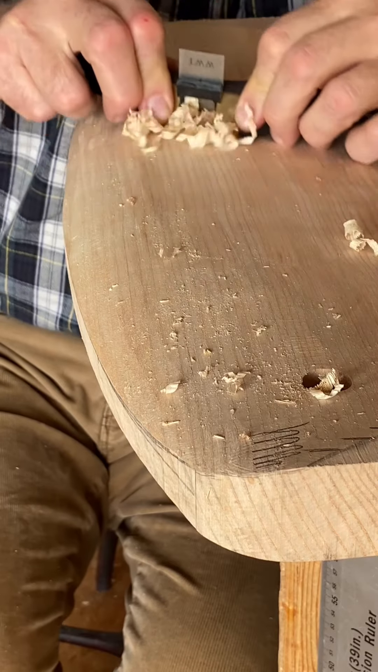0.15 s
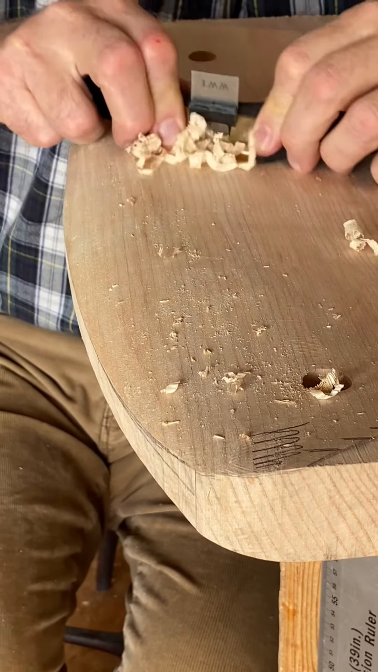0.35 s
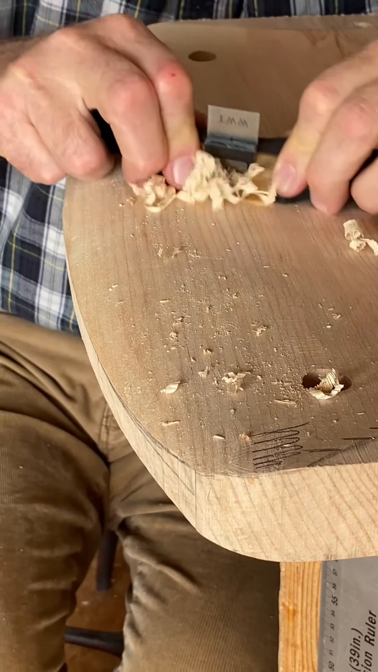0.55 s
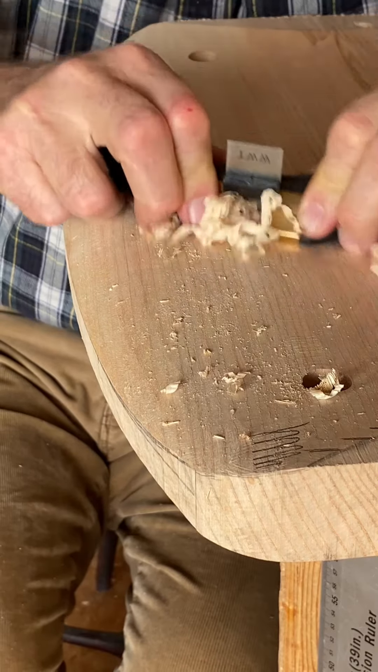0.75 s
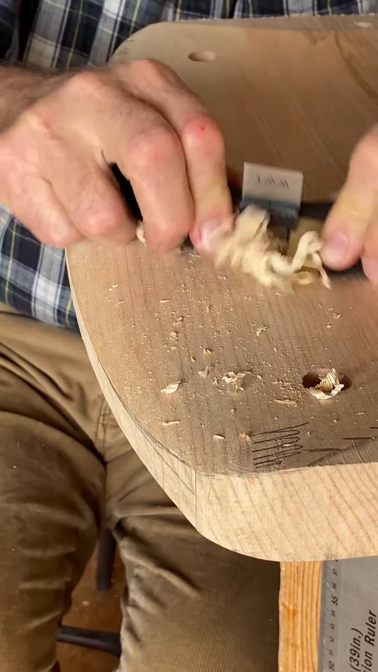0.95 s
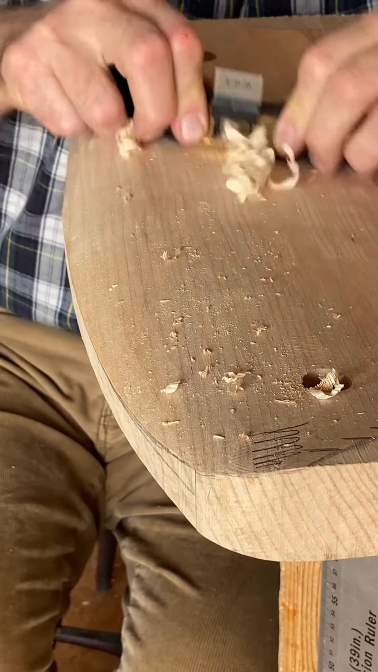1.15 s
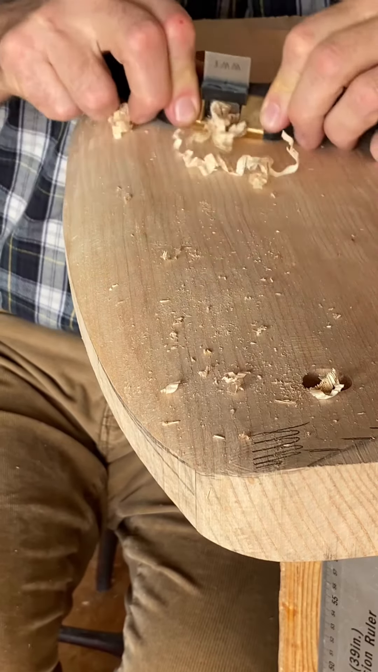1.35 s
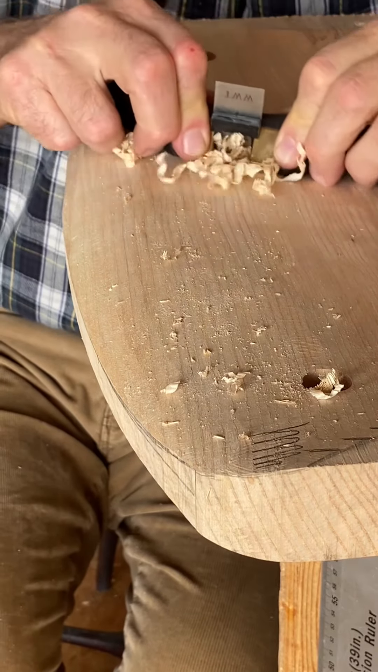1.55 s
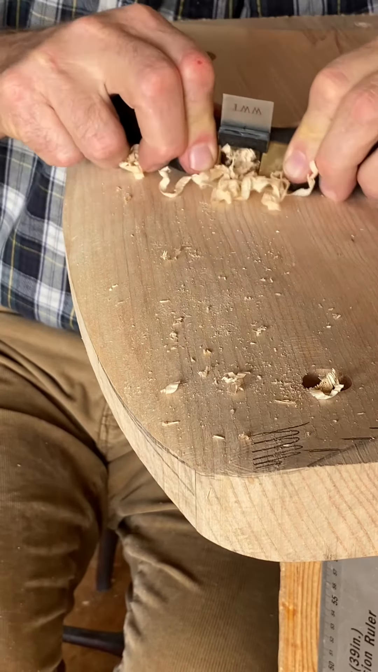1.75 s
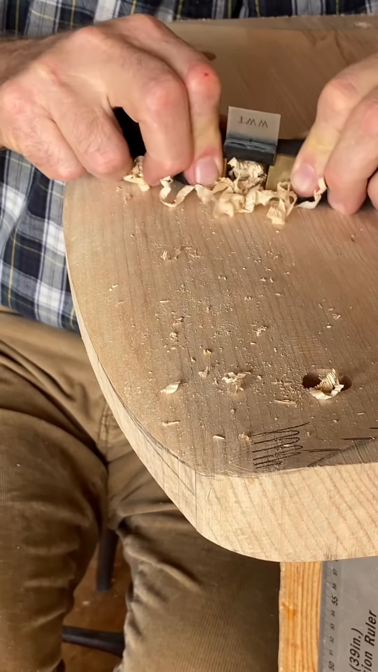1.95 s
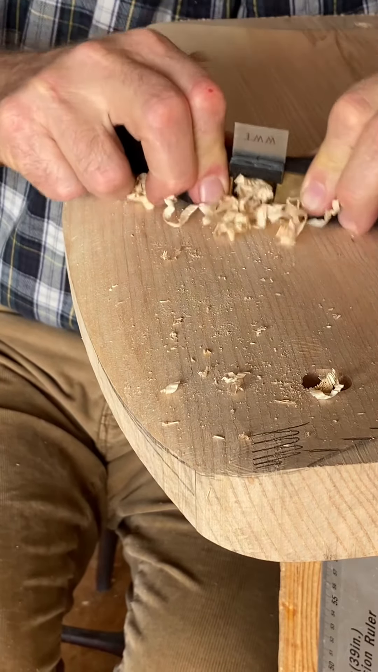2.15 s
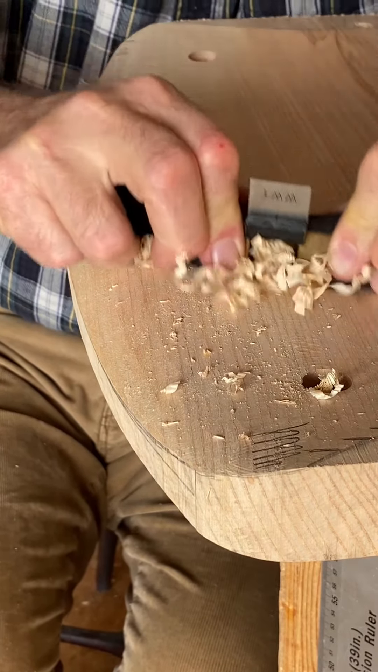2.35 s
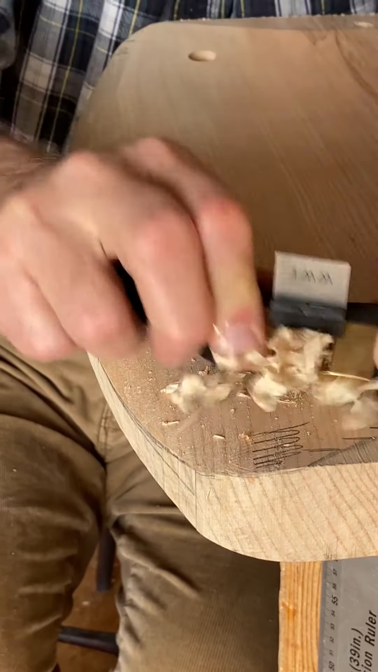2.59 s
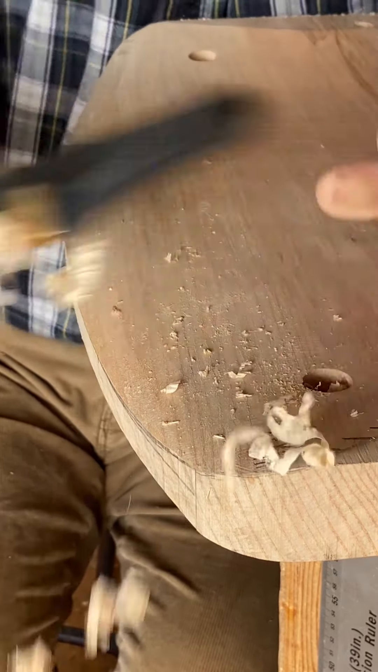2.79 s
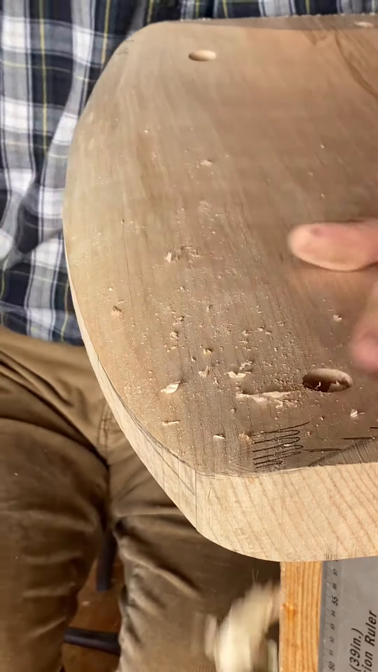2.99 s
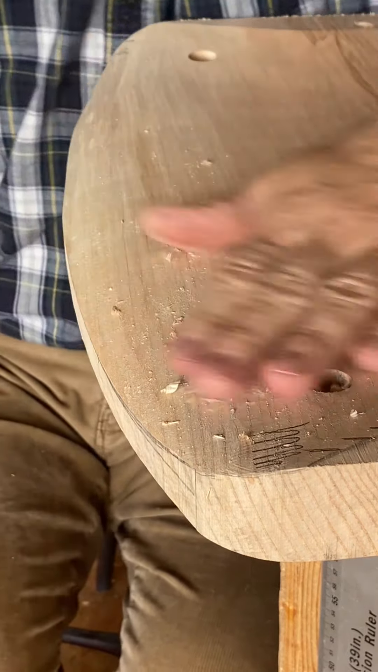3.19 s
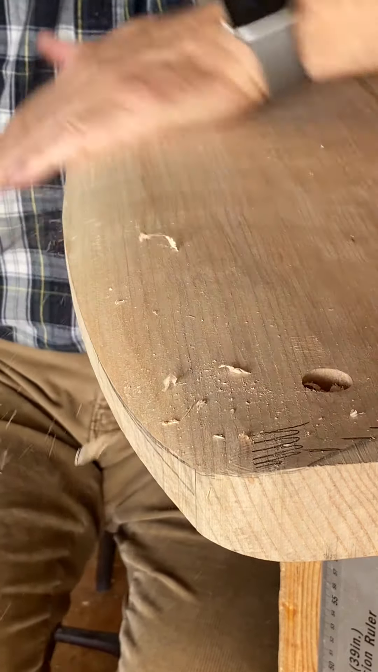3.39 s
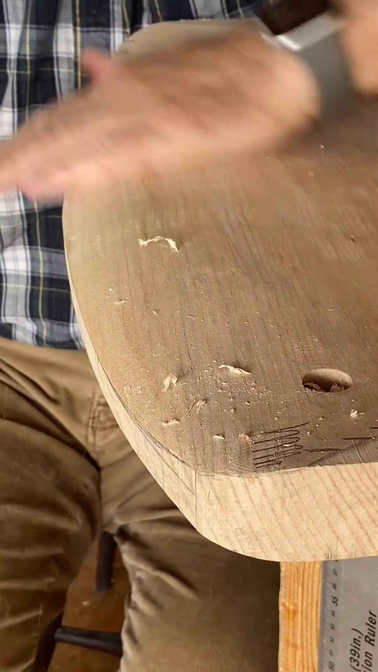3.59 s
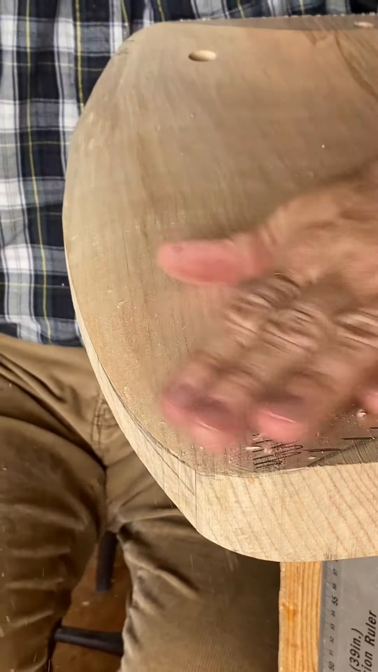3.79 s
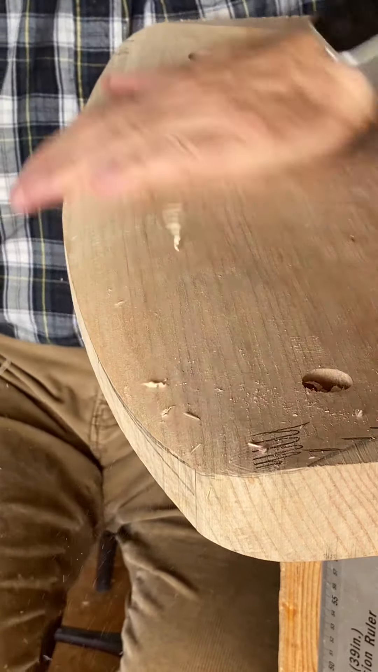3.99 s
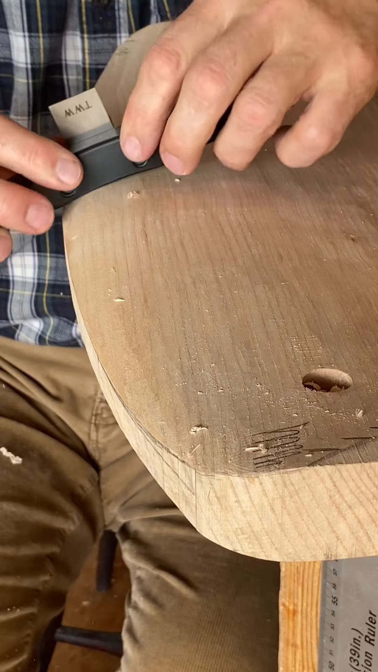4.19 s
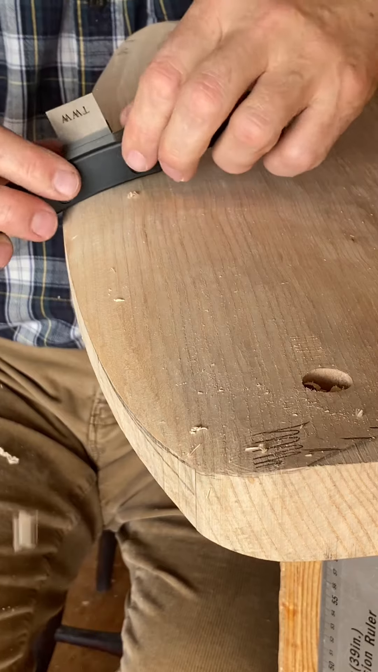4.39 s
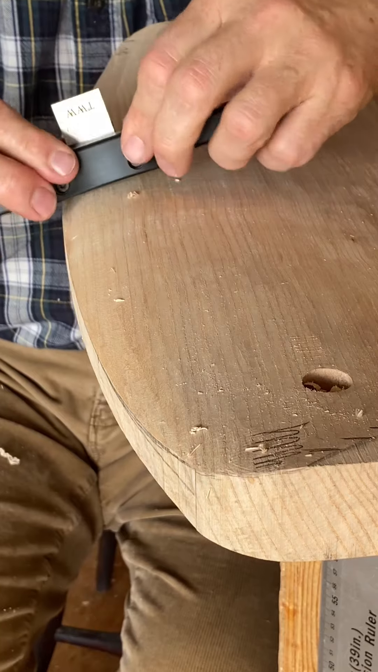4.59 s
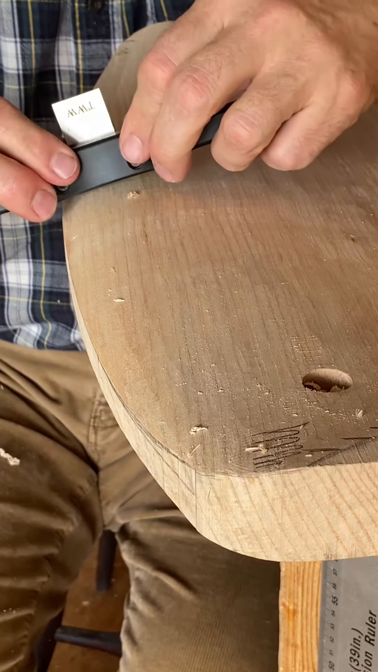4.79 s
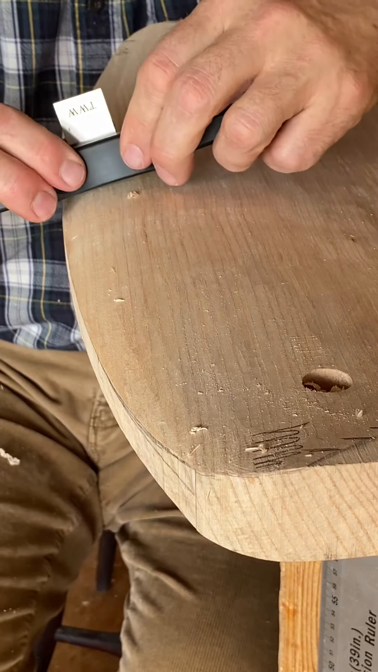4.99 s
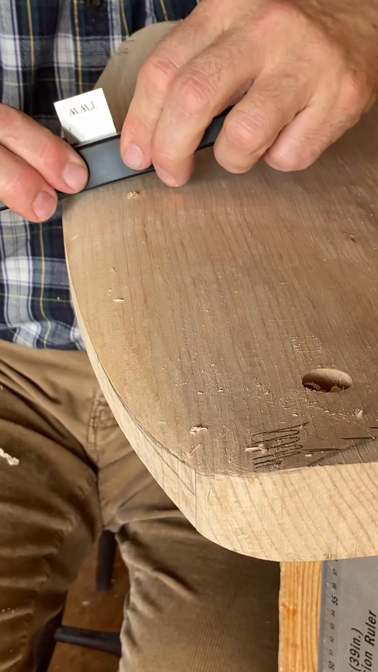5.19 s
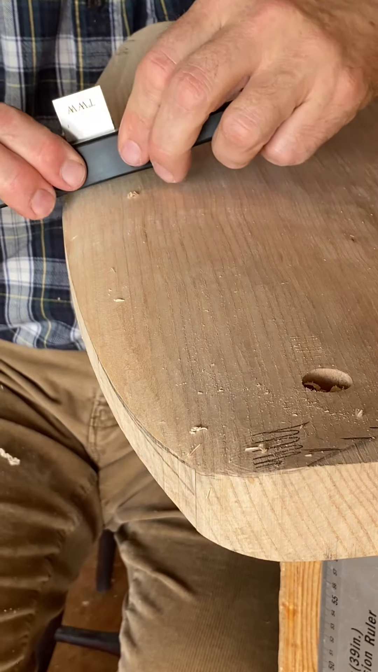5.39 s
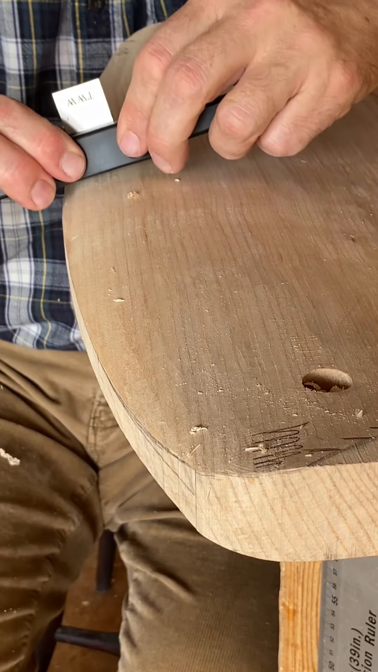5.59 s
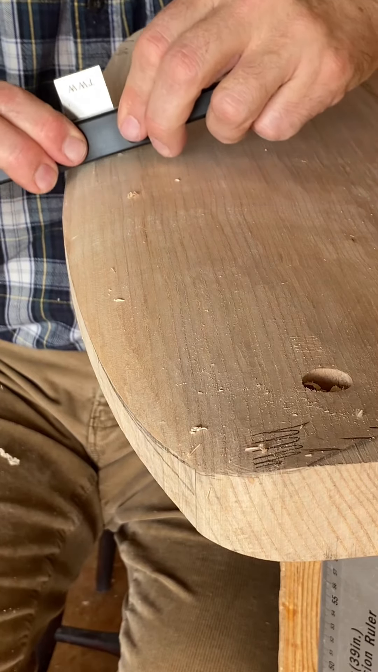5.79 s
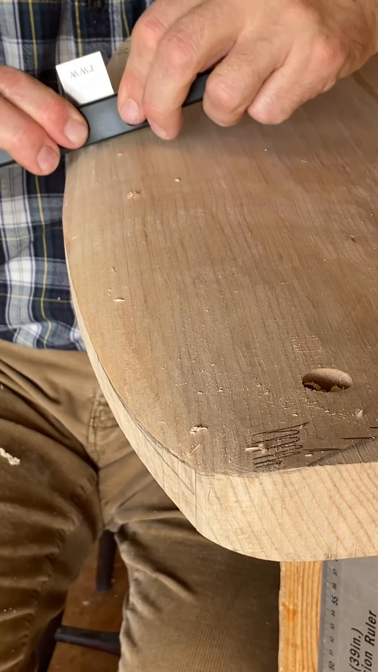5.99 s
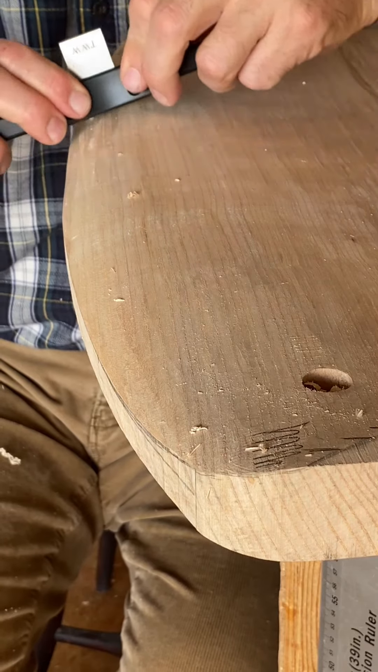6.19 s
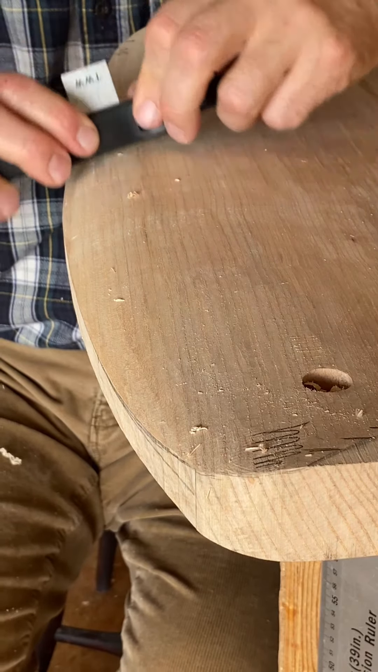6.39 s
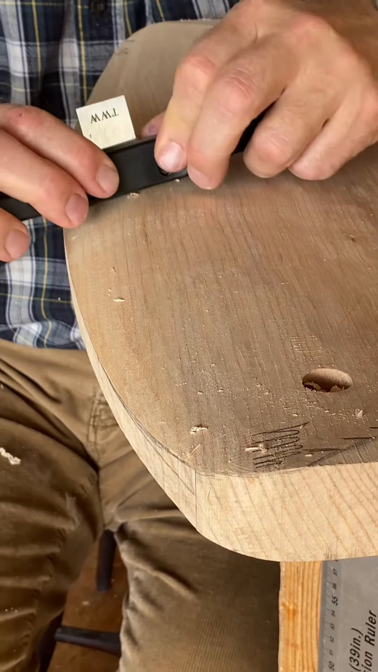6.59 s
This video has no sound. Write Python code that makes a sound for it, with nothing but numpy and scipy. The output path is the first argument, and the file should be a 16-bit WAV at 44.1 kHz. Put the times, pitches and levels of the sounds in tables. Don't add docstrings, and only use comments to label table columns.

```python
import sys
import numpy as np
from scipy import signal
from scipy.fft import rfft, irfft, next_fast_len
from scipy.io import wavfile
from scipy.ndimage import uniform_filter1d

SR = 44100
rng = np.random.default_rng(int(sys.argv[2]) if len(sys.argv) > 2 else 0)


def pcm_store(signal):
    levels = np.round(np.clip(np.atleast_2d(signal), -1, 1) * 32767)
    wavfile.write(sys.argv[1], SR, levels.astype(np.int16).T)


def field_ratio(decibels):
    return 10 ** (np.asarray(decibels, dtype=float) / 20)


N = 293265
SCENE_CHANGE_S = 4.018

# f/Hz, width/Hz, level/dB
PLANK_MODES = [(210.7, 54, -1.5), (246.7, 5.1, 8), (285, 21, -3), (346.2, 18, -2), (408.8, 23, -3),
               (463.2, 29, -1.5), (495, 20, -4.5), (547.8, 8.7, -0.5), (623.4, 49, -5.5), (724, 33, -1),
               (755, 162, -6), (942, 8.1, 3)]
# f/Hz, width/Hz, level/dB
BENCH_MODES = [(45, 9.9, -5), (84, 23, 0), (138.4, 13, 3), (175.4, 32, -1)]
# f/Hz, width/Hz, level/dB
BLADE_MODES = [(957, 28, 12), (1020, 144, 9.5), (1135.5, 76, 12.5), (1416, 63, 3.5), (1585, 35, 5.5),
               (1683, 84, 1), (1886, 51, 4), (1977, 160, 0.5), (2293, 78, 1.5), (2433, 71, 0),
               (2733, 173, -1), (2952, 120, 0), (3250, 350, -6), (3717, 80, -5.5)]


def unit_rms(x):
    return x / np.sqrt(np.mean(x ** 2) + 1e-20)


def read(points, hz):
    f, value = np.transpose(points)
    return np.interp(np.log(hz + 1), np.log(f + 1), value)


def colour(x, gain):
    size = next_fast_len(x.shape[-1] + 4096)
    spectrum = rfft(x, size) * gain(np.fft.rfftfreq(size, 1 / SR))
    return irfft(spectrum, size)[..., :x.shape[-1]]


def colour_db(x, points):
    return colour(x, lambda f: field_ratio(read(points, f)))


def dull(x, hz):
    return signal.sosfilt(signal.butter(3, min(hz, 20000), fs=SR, output="sos"), x)


def ring(x, hz, width_hz):
    r = np.exp(-np.pi * width_hz / SR)
    return signal.lfilter([1 - r, 0, r - 1], [1, -2 * r * np.cos(2 * np.pi * hz / SR), r * r], x)


def wander(count, per_s):
    knots_per_s = 400
    knots = rng.standard_normal(int(count / SR * knots_per_s) + 2)
    smooth = uniform_filter1d(knots, max(int(knots_per_s / per_s), 1))
    return unit_rms(np.interp(np.arange(count) / SR * knots_per_s, np.arange(len(knots)), smooth))


def slips(count, per_s, spread_db):
    when, size, sign = rng.random((3, count))
    happens = when < per_s / SR
    strength = field_ratio(spread_db * np.minimum(-np.log(size + 1e-9), 5))
    return unit_rms(happens * strength * np.sign(sign - 0.5))


def swell(t, rows, levels_db, law):
    peak, rise, fall = np.transpose(rows)[:3, :, None]
    coarse = t[::32]
    from_peak = np.where(coarse < peak, (peak - coarse) / abs(rise), (coarse - peak) / abs(fall))
    speed = np.cos(np.pi / 2 * np.clip(from_peak, 0, 1))
    power = (field_ratio(np.asarray(levels_db)[:, None]) * speed ** law) ** 2
    return np.interp(t, coarse, np.sqrt(power.sum(axis=0)))


def resting(level, lift_db=0):
    return level + field_ratio(-22 + lift_db) * uniform_filter1d(level, SR // 6)


def controls(rows):
    s, *columns = np.transpose(rows)
    t = np.arange(max(s[0], 0), s[-1], 1 / SR)
    return round(t[0] * SR), [np.interp(t, s, c) for c in columns]


def add(mix, start, sound):
    part = mix[start:][:len(sound)]
    part += sound[:len(part)]


def body(drive, modes, near_hz=None, focus_db=0, shift_db=0):
    out = 0
    for k, (hz, width_hz, db) in enumerate(modes):
        octaves = 0 if near_hz is None else np.log2(hz / near_hz)
        reach_db = db - focus_db * octaves ** 2 + shift_db * wander(len(drive), per_s=7)
        out = out + (-1) ** k * ring(drive * field_ratio(reach_db), hz, width_hz)
    return unit_rms(out)


def scraper(rows, contact, fibre, chatter_db, focus_db):
    start, (near_hz,) = controls(contact)
    n = len(near_hz)
    t = (start + np.arange(n)) / SR
    force_db, speed_db = np.transpose(rows)[3:]
    jerk = wander(n, per_s=30)
    edge = slips(n, per_s=2500, spread_db=0.0)

    force = resting(swell(t, rows, force_db, law=1.28))
    plank = force * body(dull(edge, 1400) * field_ratio(1.1 * jerk), PLANK_MODES, near_hz, focus_db, shift_db=5.0)

    between_db = 0.38 * force_db + 0.62 * speed_db + chatter_db
    chatter = resting(swell(t, rows, between_db, law=1.85), lift_db=5.5)
    chatter = chatter * field_ratio(3.5 * np.log2(near_hz / 450))
    blade_hz = np.clip(1500 * (unit_rms(chatter) + 1e-6) ** 0.45, 900, 3500)
    blade_drive = dull(edge, 5300) * field_ratio(1.4 * jerk)
    blade = chatter * body(blade_drive, BLADE_MODES, blade_hz, focus_db=1.5, shift_db=2.5)

    rumble = swell(t, rows, 0.38 * force_db - 37.5, law=0.66) * field_ratio(3 * wander(n, per_s=20))
    bench = rumble * body(dull(edge, 360), BENCH_MODES)

    tear = slips(n, per_s=23000, spread_db=2.5) * field_ratio(0.71 * jerk + 0.49 * wander(n, per_s=150))
    hiss_level = resting(swell(t, rows, speed_db + 9.0, law=1.3), lift_db=5.0)
    hiss = hiss_level * unit_rms(colour_db(tear, fibre))
    return start, plank + blade + bench + hiss


def catch(s, db, hz, t60):
    t = np.arange(round(t60 * SR)) / SR
    shape = (1 - np.exp(-t * hz / 0.56)) * field_ratio(-60 * t / t60)
    return round(s * SR), field_ratio(db) * shape / shape.max() * np.sin(2 * np.pi * hz * t)


def palm():
    # fastest at t/s, speeding up/s, slowing/s, skin friction level/dB, crackle level/dB
    sweeps = [
        (2.86, 0.083, 0.079, -73.5, -73.5),
        (2.97, 0.1, 0.29, -60.5, -60),
        (3.291, .29, 0.11, -40, -54),
        (3.59, 0.19, 0.12, -43.5, -57),
        (3.645, 0.019, 0.038, -50.5, -47),
        (3.888, 0.26, 0.24, -42.5, -55),
    ]
    # f/Hz, level/dB
    skin_colour = [(800, -9.5), (1500, -1.5), (2800, 2), (4500, -0.5), (5700, 2.5), (8000, -4),
                   (11500, -28), (13000, -15), (15700, -27.5)]
    # f/Hz, level/dB
    crackle_colour = [(5000, -5), (9000, 1), (12000, -3), (14500, 0.5), (15700, -4.5)]
    start, n = round(2.75 * SR), round(1.3 * SR)
    t = (start + np.arange(n)) / SR
    skin_db, crackle_db = np.transpose(sweeps)[3:]

    rub = slips(n, per_s=25000, spread_db=-5.5) * field_ratio(1.1 * wander(n, per_s=60))
    skin = swell(t, sweeps, skin_db + 0.5, law=2.73) * unit_rms(colour_db(rub, skin_colour))

    bits = slips(n, per_s=6000, spread_db=1.5) * field_ratio(1.8 * wander(n, per_s=90))
    crackle = swell(t, sweeps, crackle_db + 9.5, law=0.8) * unit_rms(colour_db(bits, crackle_colour))

    drag_level = swell(t, sweeps, skin_db - 17, law=0.49)
    drag = drag_level * body(rub, PLANK_MODES, 900, focus_db=4.5, shift_db=3.5)
    return start, (skin + crackle + drag) * (t < SCENE_CHANGE_S)


def knock(s, db, near_hz, t60):
    t = np.arange(SR // 2) / SR
    shudder = rng.standard_normal(len(t)) * np.minimum(t / 0.0004, 1) * field_ratio(-60 * t / t60)
    modes = body(shudder, BENCH_MODES + PLANK_MODES + BLADE_MODES[3:], near_hz, focus_db=8)
    thud = unit_rms(ring(shudder, near_hz, 0.33 * near_hz))
    sound = dull(modes + 0.93 * thud, 1.3 * near_hz)
    return round(s * SR), field_ratio(db) * sound / np.sqrt(np.mean(sound[:2000] ** 2))


def snap(s, db, hz):
    burst = rng.standard_normal(300) * np.exp(-np.arange(300) / SR / 0.0014)
    burst = ring(ring(burst, hz, 0.8 * hz), hz, 1.4 * hz)
    return round(s * SR), field_ratio(db) * burst / abs(burst).max()


def shifting():
    # loudest at t/s, rise/s, fall/s, level/dB
    moves = [
        (4.04, .025, 0.096, -48.5),
        (4.11, .05, .12, -50.5),
        (4.329, .1, 0.085, -60.5),
        (4.82, 0.029, .08, -63.5),
        (4.91, .02, 0.045, -61),
        (5.2, 0.027, .03, -51),
    ]
    start, n = round(SCENE_CHANGE_S * SR) + 200, round(1.3 * SR)
    t = (start + np.arange(n)) / SR
    rub = slips(n, per_s=19000, spread_db=-12.5)
    level = swell(t, moves, np.transpose(moves)[3] - 8, law=2.4)
    return start, level * body(dull(rub, 1800), BENCH_MODES + PLANK_MODES + BLADE_MODES, 370, focus_db=13.5)


def shop(x, wet_db):
    # f/Hz, t60/s
    decay = [(80, 0.75), (400, 0.85), (1000, 1), (3000, 1), (10000, 0.42)]
    hz, t, z = signal.stft(rng.standard_normal(SR * 3 // 4), SR, nperseg=256)
    tail = signal.istft(z * field_ratio(-60 * t / read(decay, hz)[:, None]), SR, nperseg=256)[1]
    tail[:260] = 0
    tail = colour(tail, lambda f: np.sqrt(0.5 / read(decay, f)) * field_ratio(-3.5 * np.log2(f / 500 + 1)))
    return x + field_ratio(wet_db) * signal.oaconvolve(x, tail / np.linalg.norm(tail))[:N]


def air():
    # f/Hz, level/dB
    air_colour = [(30, -10), (60, 19), (130, 9.5), (350, -5), (600, -12), (1000, -12), (1600, -23),
                  (2500, -26), (4000, -30), (6500, -30), (10000, -33.5), (15500, -49)]
    noise = unit_rms(colour_db(rng.standard_normal(N), air_colour))
    return field_ratio(-63.5 + 0.37 * wander(N, per_s=9.6)) * noise


def ports(x):
    # f/Hz, lead/rad
    lead = [(100, 0), (600, -.1), (1200, -.5), (2100, 0), (2600, .85), (3400, .05), (4150, .05),
            (5000, 2.3), (5500, 1.5), (8000, 2.7), (9800, 3.14), (11300, 3.45), (13000, 4.15), (15800, 5.5)]
    # f/Hz, level/dB
    tilt = [(60, -0.5), (120, 0.5), (240, 1.4), (480, 2), (950, 1.8), (1890, -2.5), (3770, 1), (7520, 1),
            (15000, 0)]
    # f/Hz, share/0-1
    apart = [(100, .02), (400, .16), (800, .32), (1300, .42), (2000, .18), (2800, .17), (3500, .1),
             (4200, .1), (5000, .28), (8000, .18), (10000, .05), (12000, .2), (15000, .28)]
    z = signal.stft(x, nperseg=512)[2]
    other = signal.istft(z * np.exp(2j * np.pi * rng.random(z.shape)), nperseg=512)[1][:N]
    other *= np.std(x) / np.std(other)

    def share(f):
        return np.clip(read(apart, f), 0, 1)

    same = colour(x, lambda f: np.sqrt(1 - share(f) ** 2))
    differs = colour(other, share)

    def port(side):
        return lambda f: field_ratio(0.5 * side * read(tilt, f)) * np.exp(0.5j * side * read(lead, f))

    return np.array([colour(same + side * differs, port(side)) for side in (1, -1)])


def scene():
    # fastest at t/s, speeding up/s, slowing/s, cutting force level/dB, edge speed level/dB
    strokes = [(0.11, 0.14, 0.14, -37, -59.5), (0.40, 0.32, 0.16, -38, -58.5),
               (0.55, 0.11, 0.079, -40.5, -60), (0.702, 0.19, 0.13, -33.5, -50.5),
               (0.90, 0.076, .1, -40.5, -58.5), (1.028, 0.18, 0.2, -33.5, -57.5),
               (1.342, 0.13, .15, -37, -57), (1.50, 0.16, 0.096, -39, -68), (1.72, 0.23, 0.12, -41, -65),
               (1.888, 0.16, 0.082, -42.5, -70), (2.031, 0.095, 0.18, -40.5, -60.5),
               (2.14, 0.09, .17, -32, -52.5), (2.29, 0.16, 0.2, -35, -53),
               (2.399, 0.09, 0.16, -39.5, -56.5), (2.54, 0.13, 0.27, -55, -71)]
    strokes_late = [(5.22, .05, .05, -52.5, -105), (5.295, 0.039, .06, -46.5, -93),
                    (5.41, 0.089, .1, -47, -87.5), (5.531, 0.1, .17, -39, -76),
                    (5.721, .18, 0.24, -39, -68.5), (5.94, 0.14, .12, -33.5, -64),
                    (6.04, 0.12, .09, -38, -63.5), (6.21, .07, .08, -40, -75.5),
                    (6.299, .09, .1, -34.5, -69.5), (6.43, 0.16, .06, -39.5, -66),
                    (6.59, .1, .25, -40, -63.5)]
    # t/s, f/Hz
    contact = [
        [(0, 504), (.6, 458), (.69, 346), (.8, 420), (1.06, 539), (2.06, 427), (2.13, 360), (2.4, 453),
         (2.8, 312)],
        [(5.15, 306), (5.6, 355), (5.9, 433), (5.98, 378), (6.14, 419), (6.28, 704), (6.45, 661), (6.55, 454),
         (6.65, 327)],
    ]
    # f/Hz, level/dB
    fibre = [(1500, -20), (3000, -4), (4300, -3), (6000, 1), (7800, 3), (8500, -3), (10200, 3), (11000, -3),
             (12000, -1), (13000, -2), (15700, -2)]
    # f/Hz, level/dB
    fibre_late = [(1500, -20), (3000, -2), (5500, 0), (7000, -5), (8000, 4), (9100, -6), (10400, 1),
                  (11000, -1), (11700, 5), (12700, -5), (13500, 4), (15000, -6), (15800, -4)]
    # t/s, peak level/dB, f/Hz, t60/s
    catches = [(0.344, -27.5, 464, 0.081), (0.359, -30, 492, 0.054), (0.483, -31.5, 513, 0.23),
               (0.697, -30.5, 285, 0.062), (0.978, -28, 553, 0.079), (0.984, -27, 435, 0.11),
               (1.024, -17, 568, 0.069), (1.06, -18.5, 551, 0.089), (2.115, -34.5, 271, 0.24),
               (2.196, -24, 570, 0.03), (2.477, -31.5, 498, 0.047), (5.928, -31.5, 460, 0.026),
               (6.3, -31.5, 735, 0.16)]
    # t/s, peak level/dB, f/Hz, t60/s
    pushes = [
        (2.485, -38.5, 84, 0.18),
        (2.518, -41.5, 128.7, 0.36),
        (2.862, -40, 84, 0.22),
        (3.648, -41, 135.4, 0.42),
        (3.679, -31.5, 105, 0.088),
        (3.70, -41.5, 82, 0.4),
        (3.8, -54, 84, 0.77),
        (4.554, -47, 125.5, 0.4),
        (4.60, -53.5, 86, 0.8),
        (4.758, -53.5, 133, 0.35),
    ]
    # t/s, level/dB, loudest f/Hz, contact t60/s
    knocks = [(0.878, -49, 1200, 0.051), (0.974, -41.5, 1500, 0.14), (1.022, -40, 1200, 0.033),
              (1.061, -43, 1100, .06), (2.472, -45, 1480, 0.023), (3.646, -53, 360, 0.35),
              (4.551, -54, 680, 0.29), (4.552, -74.5, 1257, .07), (4.552, -48, 368, 0.21),
              (4.609, -56, 245, 0.3), (4.77, -61, 245, 0.27), (4.9, -75, 378, 0.12), (5.19, -65, 394, 0.22),
              (5.29, -64, 597, 0.52)]
    # t/s, peak level/dB, centre f/Hz
    snaps = [(0.816, -35, 9500), (1.608, -34.5, 12000), (1.931, -39, 5870), (2.368, -25, 12100),
             (2.838, -48, 8500), (2.941, -34.5, 3500), (2.939, -31.5, 9400), (2.98, -29, 10800),
             (3.098, -31, 14200), (3.112, -42, 12300), (3.66, -40.5, 13100), (4.032, -76, 9000),
             (4.166, -66.5, 4600), (4.207, -72, 4000), (4.231, -68, 3210), (4.45, -76.5, 8000),
             (4.874, -70, 5930), (5.196, -65.5, 1930)]

    work = np.zeros(N)
    add(work, *scraper(strokes, contact[0], fibre, chatter_db=5, focus_db=13))
    add(work, *scraper(strokes_late, contact[1], fibre_late, chatter_db=6, focus_db=7.5))
    add(work, *palm())
    add(work, *shifting())
    for make, rows in ((catch, catches), (catch, pushes), (knock, knocks), (snap, snaps)):
        for row in rows:
            add(work, *make(*row))

    before = np.clip((SCENE_CHANGE_S - np.arange(N) / SR) / 0.001, 0, 1)
    early = before * shop(work * before, wet_db=-16)
    late = shop(work * (before == 0), wet_db=-14.0)
    return ports(early + late + air())


def top_cut(x):
    return signal.sosfilt(signal.butter(12, 16850, fs=SR, output="sos"), x)


def record(dry):
    def response(f):
        top = np.clip((15760 - f) / 60 + 0.5, 0, 1)
        return top / np.sqrt(1 + (48 / (f + 1)) ** 8)

    return top_cut(colour(dry, response))


dry = scene()
out = record(dry)
pcm_store(out)
```